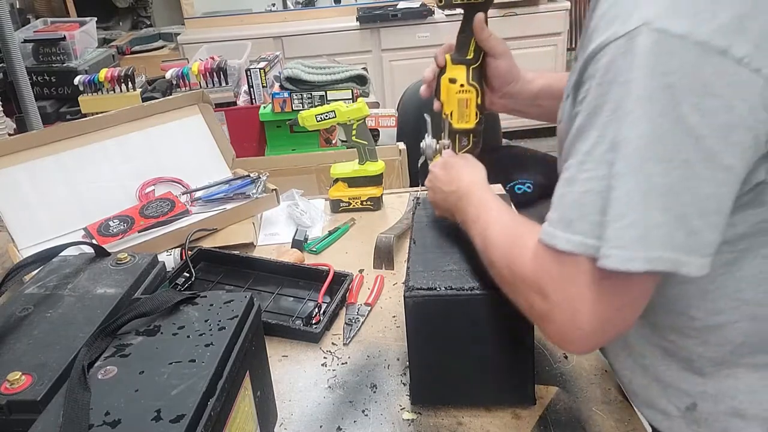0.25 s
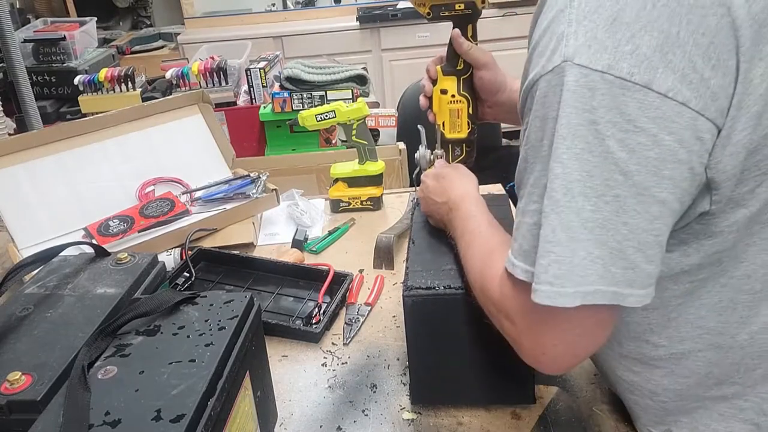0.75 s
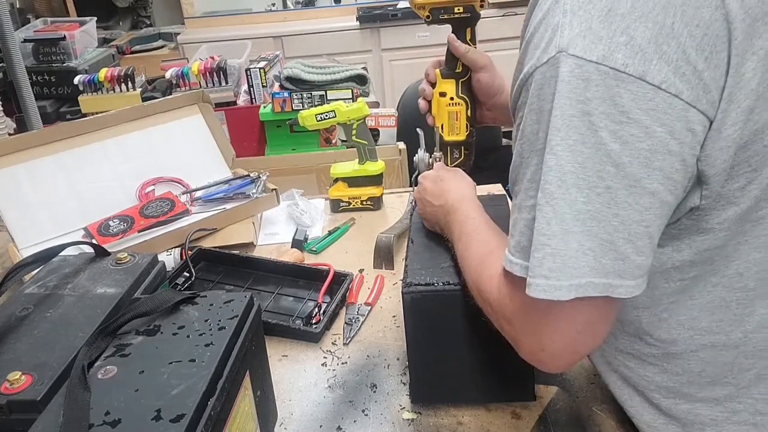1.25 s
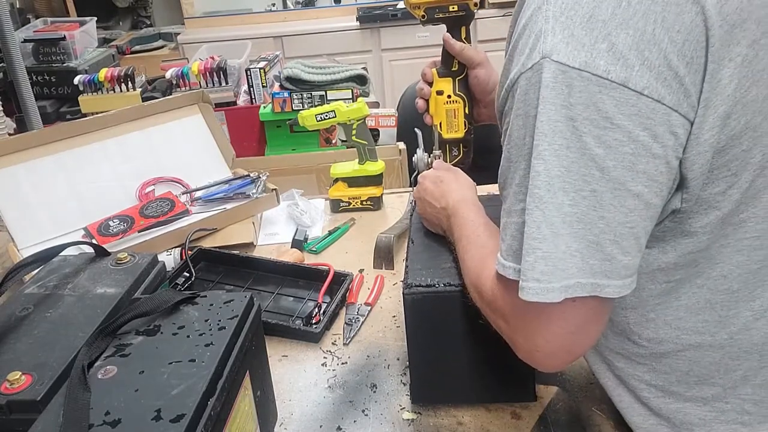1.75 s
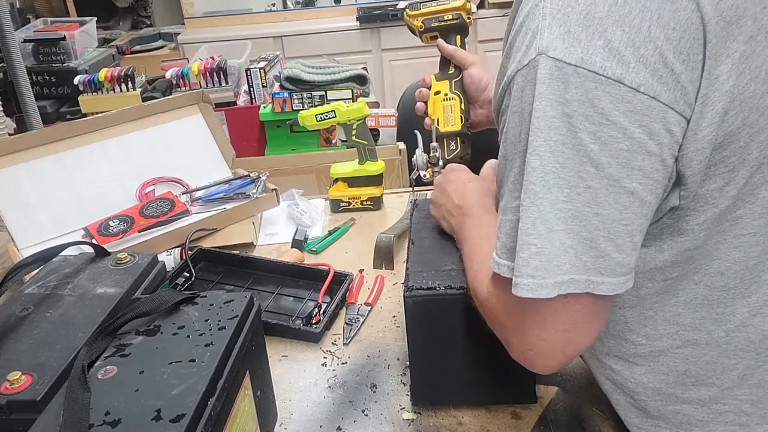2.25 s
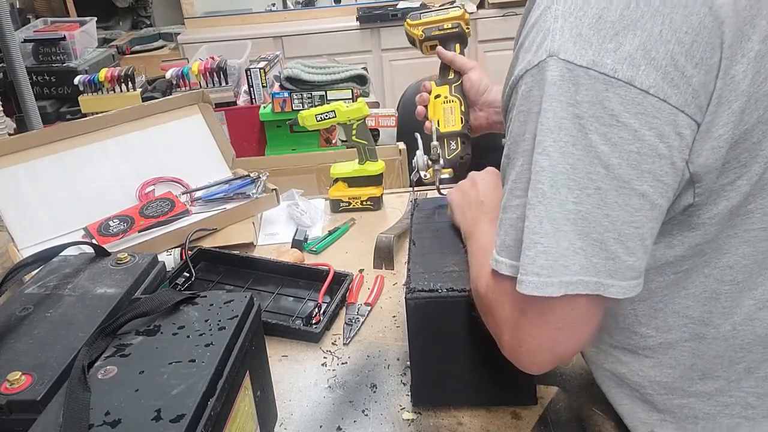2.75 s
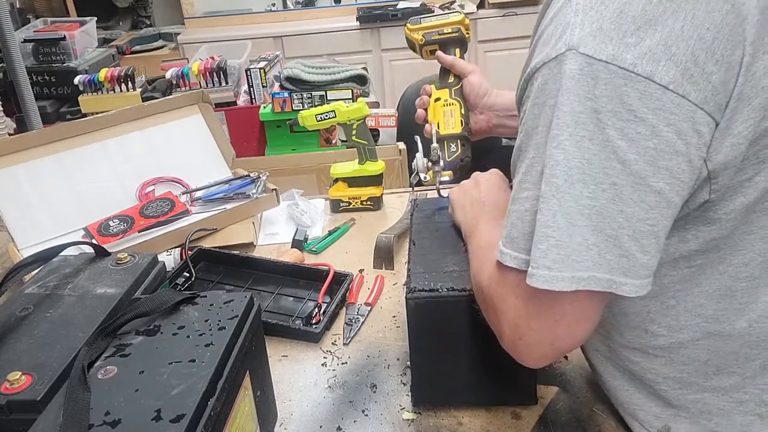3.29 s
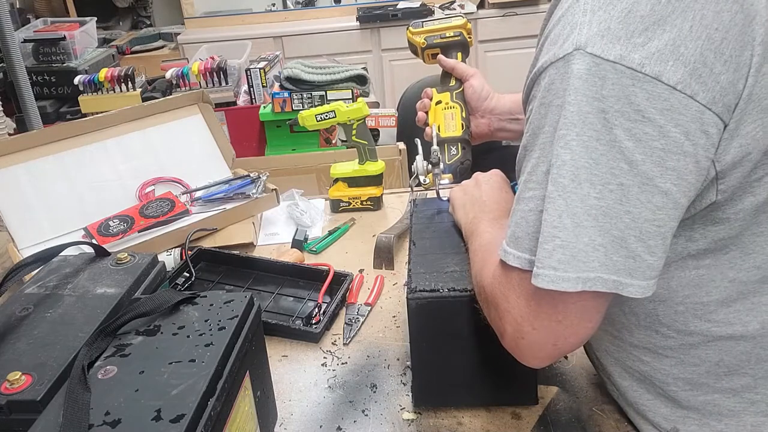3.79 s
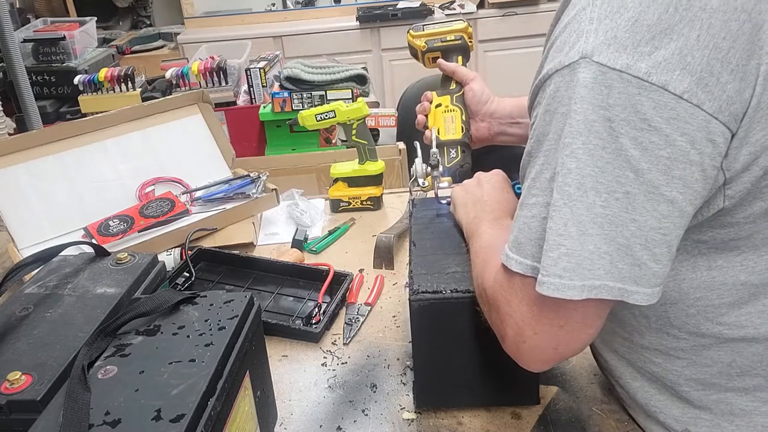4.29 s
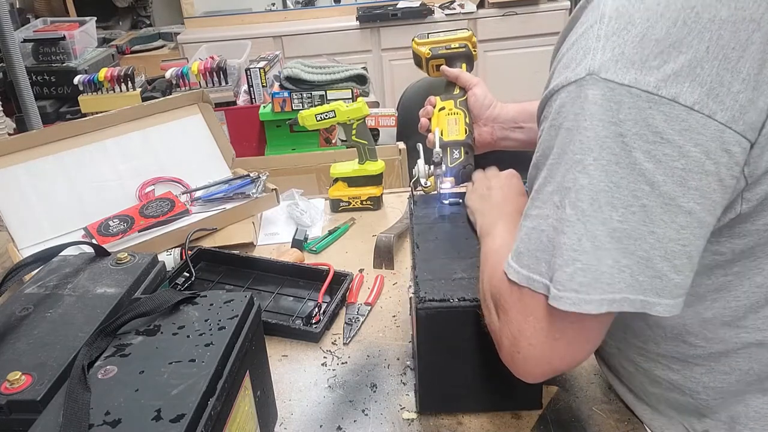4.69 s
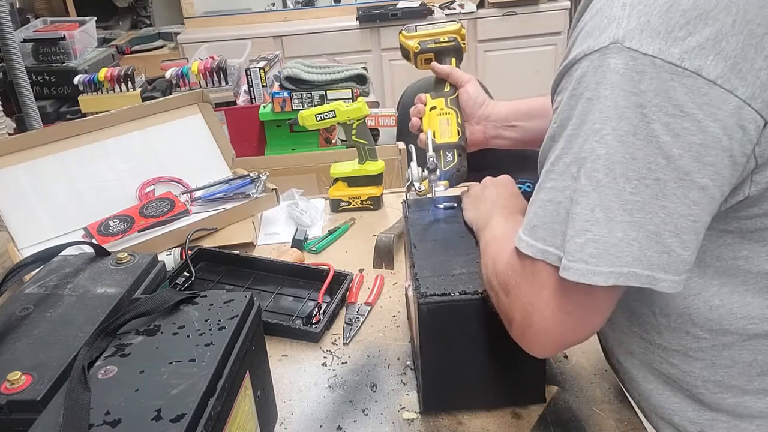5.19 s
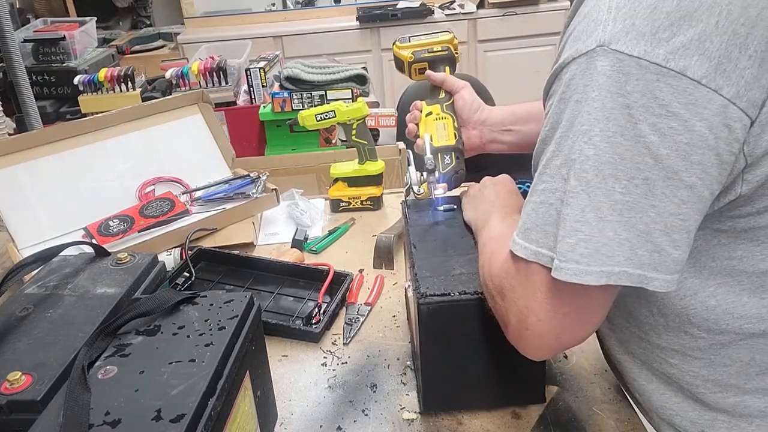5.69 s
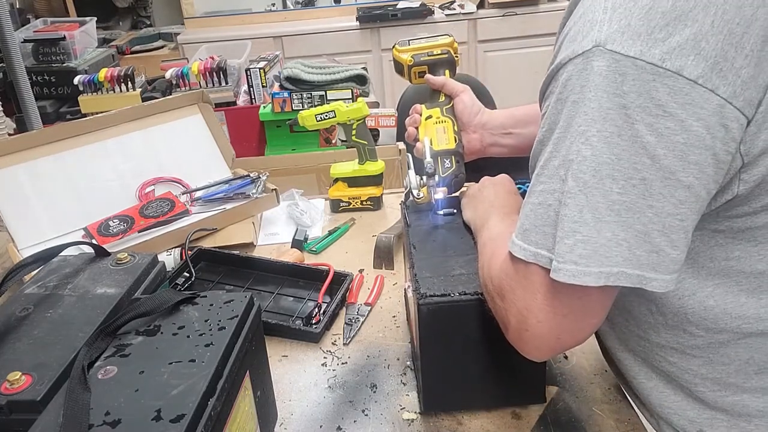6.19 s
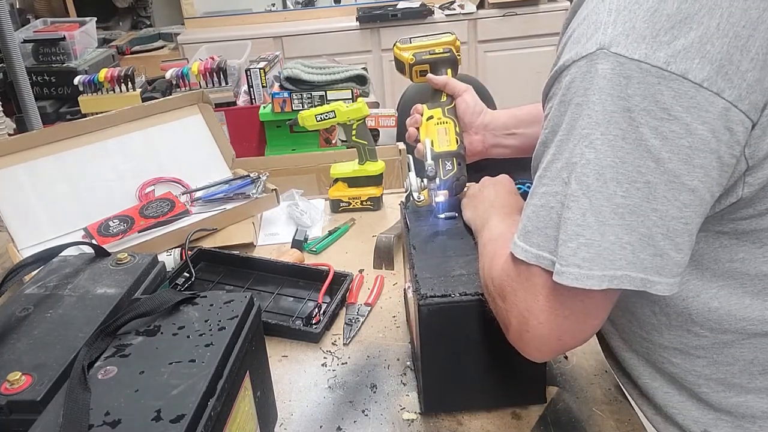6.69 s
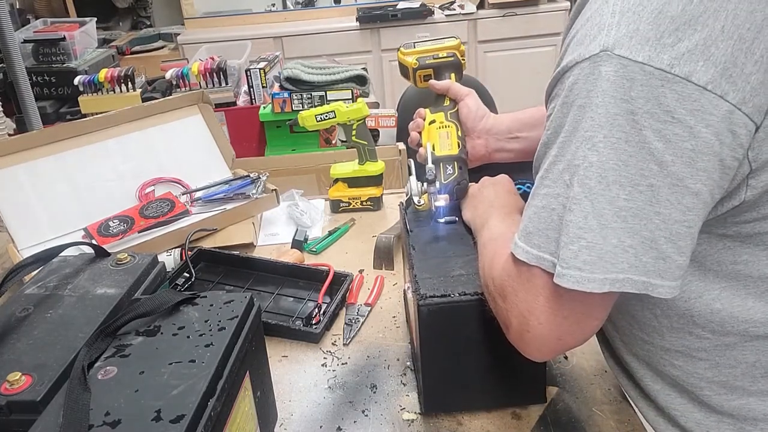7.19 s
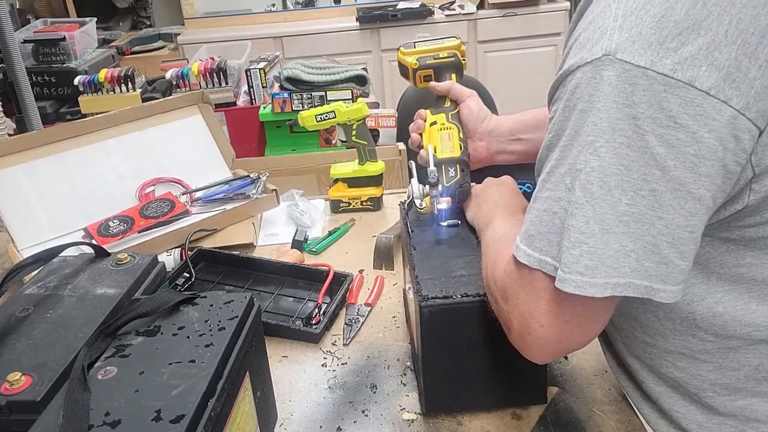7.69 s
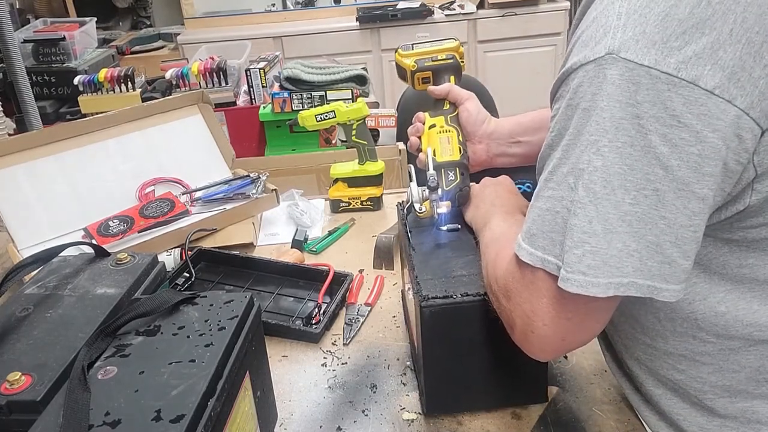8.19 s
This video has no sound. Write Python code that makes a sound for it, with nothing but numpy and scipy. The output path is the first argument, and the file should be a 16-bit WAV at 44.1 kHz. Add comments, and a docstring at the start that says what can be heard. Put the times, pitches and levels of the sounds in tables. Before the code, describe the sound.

A cordless oscillating tool starts, knocks against a hollow plastic case and saws into it with a loud, rasping buzz.

```python
"""On a workshop bench in a small room, an oscillating multi-tool starts up, knocks against a hollow
plastic case and saws into it. The blade swings once per motor turn, and the motor slows under load.
The case drums and buzzes at the swing rate and its multiples; a multiple sings out when it locks onto
a resonance of case or blade. The teeth rasp at each half swing. Two microphone ports hear the tool
from the left, over quiet room noise and the hum of a far-off machine."""
import sys
import numpy as np
from scipy import signal
from scipy.fft import rfft, irfft, next_fast_len
from scipy.io import wavfile
from scipy.ndimage import uniform_filter1d, map_coordinates

SR = 44100
rng = np.random.default_rng(int(sys.argv[2]) if len(sys.argv) > 2 else 0)


def output_pcm(signal):
    """Save a mono or channel-first signal as 16-bit PCM at the path in sys.argv[1].

    Samples are clipped to [-1, 1] before scaling.
    """
    pcm = np.clip(np.atleast_2d(signal).T, -1, 1) * 32767
    wavfile.write(sys.argv[1], SR, np.round(pcm).astype(np.int16))


N = 372644

# The tone of each noise. Each row: frequency in Hz, relative level in dB.
ROOM_TONE = [(20, -7), (80, -7), (300, -3), (900, -4), (2000, -12), (4000, -16), (7000, -20), (8500, -34),
             (10500, -28), (15800, -29)]
THUD_TONE = [(20, -23), (90, -9), (130, -1), (160, 2), (230, 0), (300, -7), (500, -42)]
GEAR_TONE = [(500, -24), (950, 4.5), (1500, -9), (2300, -10), (2900, 6.5), (3400, 7), (4100, -9),
             (7300, -3), (8300, -46), (9000, -70)]
RASP_TONE = [(40, -51), (120, -20), (250, -5), (600, -0.5), (1200, -5), (2200, 2.5), (3500, 3), (5000, -1),
             (7000, -18), (9000, -70)]
HISS_TONE = [(300, -23), (1000, -6), (2500, -11), (4000, -2.5), (5500, -4.5), (7000, -2.5), (8000, -8),
             (9500, -26)]
SIZZLE_TONE = [(8000, -22), (9300, -4), (10500, -7), (11800, 1.5), (13200, -3.5), (14500, -3),
               (16000, -12.5)]
# The tone of the swing's high and highest multiples. Each row: frequency in Hz, relative level in dB.
BUZZ_TONE = [(710, -38), (1200, -3.5), (1630, -1), (2310, -3), (3640, -6), (4990, -10.5), (8300, -21.5),
             (10800, -73), (18300, -120)]
EDGE_TONE = [(3500, -3), (4500, -2), (5600, -3), (7000, 0), (7900, -8), (8600, -30)]
# The far-off machine. Each row: frequency in Hz, level in dB.
HUM_NOTES = [(662.1, -76.5), (1039, -86)]
# How alike the two ports sound. Each row: frequency in Hz, likeness (1 means the same).
LIKENESS = [(60, 0.75), (200, 0.71), (600, 0.11), (1500, 0.51), (4000, 0.36), (8000, 0.37), (12000, 0.083)]
# The balance of the ports. Each row: frequency in Hz, left level minus right level in dB.
LEFT_MINUS_RIGHT = [(100, -.6), (300, .3), (950, -1), (3800, -2.4), (15000, -2.3)]
# Knocks of trigger and blade. Each row: start in seconds, strength in dB, rise time in seconds.
KNOCKS = [(.225, -57, .001), (.315, -53, .0005), (.527, -18, .0006), (.54, -20, 0.0011),
          (.578, -23.5, 0.0035), (.912, -28, .005), (0.944, -24.5, 0.006), (0.969, -27, 0.0028),
          (0.991, -35, .003), (1.315, -31, 0.0044), (1.333, -30, .002), (4.547, -30, .002),
          (6.565, -33, 0.0084), (6.664, -30, 0.008), (6.689, -28, .003)]
# Where the knocked case rings. Each row: frequency in Hz, width in Hz, gain in dB.
CASE_RESONANCES = [(496, 230, 0.5), (1046, 370, 8), (1510, 600, 7.5), (2140, 590, 6.5), (3740, 1240, 1.5),
                   (6940, 1600, -7), (12000, 3200, -22)]
# The gears scraping at the start. Each row: time in seconds, level in dB.
GEAR_LEVELS = [(.315, -58), (.36, -43), (.415, -33), (.44, -37), (.52, -38), (.6, -75)]
# The motor sagging under load. Each row: time in seconds, swings per second.
LOADED_SPEED = [(0.5, 225.0), (0.56, 220.2), (0.92, 216.8), (0.99, 210.5), (1.1, 212.1), (1.36, 192.8),
                (1.41, 194.4), (1.56, 189.3), (1.78, 187.7), (1.94, 182.8), (2.16, 189.7), (2.44, 192.1),
                (2.89, 192.7), (3.57, 185.9), (3.7, 188.9), (3.97, 184.2), (4.41, 184.6), (4.77, 190.8),
                (4.88, 191.2), (4.99, 187.5), (5.37, 188.5), (5.65, 181.2), (6.685, 176.4), (6.72, 183.4),
                (6.91, 182.7), (7.09, 178.8), (7.62, 179.7), (8.44, 174.7)]
# How the blade sits. Each row: time in seconds, unrest from 0 (firm in its slot) to 1 (skipping).
UNREST = [(.3, 1), (1.35, 1), (1.45, .2), (2.1, .2), (3.0, .15), (3.5, .35), (4.4, .3), (4.6, .7),
          (5.4, .6), (5.55, .08), (6.3, .08), (6.5, .8), (6.75, .5), (7.2, .08), (8.05, .08), (8.2, .5)]
# The strength of the cut. Each row: time in seconds, hiss of motor and teeth in dB, blade bite in dB.
CUT_LEVELS = [(0.32, -42, -63), (0.34, -50, -50), (0.41, -41, -26.5), (0.52, -46, -34), (0.82, -43, -32),
              (0.84, -49, -34), (0.95, -42, -33.5), (1.29, -39, -31), (1.34, -40.5, -33),
              (1.88, -39.5, -32), (2.08, -47, -35.5), (2.49, -43.5, -34.5), (2.72, -42.5, -34),
              (3.46, -39.5, -31.5), (3.64, -40, -32.5), (4.84, -38.5, -32), (5.23, -40.5, -33.5),
              (5.38, -38, -32), (5.5, -40.5, -32.5), (5.72, -37.5, -31.5), (7.22, -38, -32),
              (7.33, -38, -31), (8.17, -39.5, -33.5), (8.44, -37.5, -30.5)]
# The drumming walls. Each row: time in seconds, level at the swing rate in dB, at twice that rate in dB.
DRUM_LEVELS = [(0.36, -83, -84), (0.4, -59, -69), (.44, -57, -55), (.52, -62, -60), (.548, -42, -44),
               (.572, -58, -48), (0.595, -41, -45), (0.63, -39, -64), (0.85, -49, -48), (0.9, -42.5, -46.5),
               (1.19, -50.5, -54.5), (1.24, -64, -48), (1.3, -46, -49), (1.58, -39, -42),
               (1.87, -41, -30.5), (2.05, -51, -44.5), (2.09, -42.5, -46.5), (2.56, -33, -37.5),
               (3.42, -36.5, -36.5), (3.49, -36, -32.5), (4.05, -39, -37), (4.52, -41, -37.5),
               (4.64, -36.5, -29.5), (4.75, -30.5, -36), (5.18, -42, -38.5), (5.31, -41.5, -46),
               (5.42, -41.5, -38.5), (5.87, -52, -41.5), (6.64, -54.5, -48.5), (6.73, -51, -32),
               (7.04, -54.5, -36), (8.06, -51, -39.5), (8.15, -46, -44.5), (8.44, -41.5, -36)]
# The walls at 3, 4, 5 and 6 times the swing rate. Each entry: level relative to the bite in dB.
UPPER_DRUM_DB = [-16.5, -10.5, -11, -10.5]
# Locks onto a resonance. Each row: start in seconds, length in seconds, multiple, level in dB.
LOCKS = [(0.448, .05, 8, -42), (0.463, 0.057, 16, -38), (0.604, 0.17, 3, -36), (0.65, 0.26, 10, -37.5),
         (0.674, 0.27, 4, -43), (1.024, 0.11, 5, -36), (.74, 0.088, 12, -33.5), (.76, 0.12, 6, -41),
         (0.788, 0.051, 8, -35), (.99, 0.038, 7, -34.5), (1.065, 0.056, 16, -31), (1.087, 0.068, 7, -31),
         (1.106, 0.063, 9, -29), (1.103, 0.24, 10, -30.5), (1.122, 0.098, 3, -39.5), (1.11, 0.048, 12, -34),
         (1.12, 0.062, 14, -31.5), (1.15, .07, 8, -34.5), (1.222, 0.088, 7, -28.5),
         (1.258, 0.039, 3, -36.5), (1.271, 0.041, 17, -33), (1.41, 0.17, 17, -32.5), (1.413, 0.18, 3, -40),
         (1.402, 0.077, 4, -37), (1.406, 0.24, 5, -38.5), (1.452, 0.32, 13, -35.5), (1.47, 0.12, 11, -32),
         (1.503, 0.042, 6, -40), (1.54, .17, 16, -35.5), (1.665, 0.3, 17, -35), (1.716, 0.13, 20, -31),
         (1.69, 0.13, 3, -42.5), (1.766, 0.23, 12, -35.5), (1.83, 0.18, 5, -40), (1.89, 0.11, 16, -32),
         (2.04, 0.44, 3, -45.5), (2.15, 0.58, 9, -37.5), (2.13, .22, 10, -42), (2.2, 0.17, 14, -41.5),
         (2.28, .6, 17, -45), (2.34, 0.23, 15, -41), (2.208, 0.22, 6, -38.5), (2.365, 0.23, 10, -34.5),
         (2.47, .1, 14, -41), (2.65, 0.24, 14, -46.5), (2.7, .12, 15, -42), (2.7, .3, 10, -42),
         (2.84, .13, 9, -43), (2.506, 0.25, 3, -42), (2.745, 0.18, 5, -46), (2.894, 0.29, 6, -45),
         (2.975, 0.33, 3, -41.5), (3.088, 0.36, 8, -36.5), (3.16, 0.43, 11, -37), (3.17, 0.82, 6, -37.5),
         (3.427, 0.092, 6, -34), (3.47, .06, 4, -41), (3.463, 0.1, 15, -37), (3.476, 0.095, 14, -40),
         (3.6, 0.25, 3, -38.5), (3.6, 0.34, 4, -38), (3.793, 0.39, 11, -42), (3.884, 0.042, 11, -39),
         (3.96, 0.35, 5, -40.5), (3.97, .52, 10, -40), (4.05, 0.28, 9, -42), (4.22, 0.077, 12, -38),
         (4.33, 0.24, 4, -40), (4.51, 0.066, 11, -35.5), (4.505, 0.086, 12, -36), (4.6, 0.18, 14, -44),
         (4.73, 0.24, 11, -38), (4.717, .1, 19, -34.5), (4.773, 0.63, 4, -38.5), (4.78, .04, 18, -40),
         (4.81, 0.045, 15, -39), (4.83, 0.066, 8, -34), (4.91, .04, 24, -37), (4.872, 0.14, 3, -43),
         (4.877, 0.32, 6, -45.5), (4.983, 0.48, 5, -42.5), (5.216, 0.55, 3, -42), (5.286, 0.19, 7, -36),
         (5.31, 0.21, 6, -35.5), (5.347, 0.19, 13, -35.5), (5.366, .09, 14, -37.5), (5.51, 0.92, 6, -36.5),
         (5.524, 0.83, 9, -35), (5.555, 1.09, 5, -46), (5.68, 0.55, 20, -36), (5.742, 0.27, 16, -39.5),
         (5.79, 0.076, 8, -37), (6.19, .2, 11, -38), (6.3, .3, 12, -42), (6.34, 0.17, 8, -36),
         (6.557, 0.26, 6, -40), (6.58, 0.11, 8, -36.5), (6.72, 0.27, 10, -43.5), (6.669, 0.3, 9, -36),
         (6.717, 1.62, 4, -40), (6.956, 0.24, 6, -42.5), (6.954, 0.18, 20, -37), (7.036, 0.13, 11, -34.5),
         (7.217, 0.66, 8, -37.5), (7.22, 0.18, 11, -37.5), (7.3, 0.4, 13, -38.5), (7.235, 0.84, 6, -32),
         (7.244, 0.79, 9, -33.5), (8.05, 0.37, 12, -41), (8.085, .35, 6, -42.5), (8.097, 0.24, 20, -37.5)]

START_S, SWELL_S = .315, .075  # when the trigger closes; how long a lock takes to rise or fall
BLUR_RADIANS = .012  # how early or late single swings come
BLOCK = 32  # samples over which slow changes hold still
TIME = np.arange(N) / SR


def amp(db):
    """Turn decibels into a gain."""
    return 10 ** (np.asarray(db) / 20)


def unit(x):
    """Scale a sound to an average power of 1."""
    return x / np.sqrt(np.mean(x ** 2) + 1e-20)


def along(points, hz):
    """Read a table at any frequency, on a log scale."""
    f, v = np.transpose(points)
    return np.interp(np.log(hz + 1), np.log(f + 1), v)


def curves(rows):
    """One value per sample for each column after the time."""
    times, *columns = np.transpose(rows)
    return [np.interp(TIME, times, column) for column in columns]


def wobble(rate):
    """A smooth curve through `rate` random values a second."""
    coarse = np.arange(0, N + BLOCK, BLOCK)
    curve = map_coordinates(rng.standard_normal(int(N * rate / SR) + 4), [coarse * rate / SR])
    return np.interp(np.arange(N), coarse, curve)


def filtered(x, response):
    """Change each frequency's strength and phase by response(hz)."""
    size = next_fast_len(N + SR // 2)
    return irfft(rfft(x, size) * response(np.fft.rfftfreq(size, 1 / SR)), size)[..., :N]


def stereo_shares(hz):
    """Gains for what the ports share (mid) and what sets them apart (side)."""
    turn = np.arccos(np.clip(along(LIKENESS, hz), -1, 1)) / 2
    return np.array([np.cos(turn), np.sin(turn)])


def rush(tone, gate, patchy_db):
    """Stereo noise with random loud and soft patches, shaped in time by the gate."""
    cells = signal.stft(rng.standard_normal((2, N)), nperseg=512)[2]
    patches = uniform_filter1d(rng.standard_normal(cells.shape[1:]), size=5, axis=0)
    patches = unit(uniform_filter1d(patches, size=10, axis=1))
    noise = gate * signal.istft(cells * amp(patchy_db * patches), nperseg=512)[1][:, :N]
    mid, side = filtered(noise, lambda hz: amp(along(tone, hz)) * stereo_shares(hz))
    return unit(np.array([mid + side, mid - side]))


def workshop():
    """Quiet room noise and the faint hum of a machine far off."""
    hum = sum(np.sqrt(2) * amp(db + 1.5 * wobble(20)) * np.sin(2 * np.pi * hz * TIME)
              for hz, db in HUM_NOTES)
    return amp(-70) * rush(ROOM_TONE, 1, patchy_db=1.5) + hum


def case_ring(hz):
    """How the hollow case answers a knock: its resonances, added with alternating signs."""
    return sum((-1) ** i * amp(db) * 1j * hz * width / (centre ** 2 - hz ** 2 + 1j * hz * width)
               for i, (centre, width, db) in enumerate(CASE_RESONANCES))


def knocks():
    """Trigger and blade give short rattles of noise that ring the case."""
    blows, t = np.zeros((2, N + SR)), np.arange(SR // 5) / SR
    for start, db, rise in KNOCKS:
        noise = rng.standard_normal(len(t)) + .66 * rng.standard_normal((2, len(t)))
        ring_s = .098 + 19 * rise  # a softer blow takes longer to fall by 60 dB
        envelope = amp(db - 60 * t / ring_s) * (1 - np.exp(-t / rise))
        blows[:, round(start * SR):][:, :len(t)] += envelope * noise
    return filtered(blows[:, :N], case_ring)


def gear_scrape():
    """The gear head scrapes as it spins up."""
    rough_noise = amp(2.3 * wobble(129.4)) * rng.standard_normal(N)
    scrape = filtered(rough_noise, lambda hz: amp(along(GEAR_TONE, hz)))
    return amp(curves(GEAR_LEVELS)[0]) * unit(scrape)


def bench_thud(drum_db):
    """The bench shakes more as the case drums harder."""
    return amp(.8 * drum_db - 31) * rush(THUD_TONE, 1, patchy_db=.8)


def teeth(angle, unrest, settled, bite_db, hiss_db):
    """Tearing plastic rasps, motor and teeth hiss, and the finest scraping sizzles."""
    # The teeth cut hardest in mid swing, one way more than the other.
    strokes = amp(3 * np.cos(2 * angle) + 2.5 * np.cos(angle) + 1.1 * wobble(60))
    tearing = strokes * amp(2 * wobble(400))
    rasp = amp(bite_db - 10 + 3 * unrest) * rush(RASP_TONE, tearing, patchy_db=3)
    hiss = amp(hiss_db + .5) * rush(HISS_TONE, strokes ** .22, patchy_db=4)
    sizzle = amp(hiss_db - 10) * rush(SIZZLE_TONE, strokes ** .45, patchy_db=1.5)
    return np.sqrt(settled) * (rasp + hiss) + settled * sizzle


def drumming_walls(angle, phases, unrest, walls_db):
    """The blade shakes the walls of the case at the lowest multiples of its swing."""
    out = np.zeros((2, N))
    for k, db in enumerate(walls_db, 1):
        apart = .13 * k * wobble(7)  # reflections shift the phase between the ports
        level = amp(db + (1 + 1.8 * unrest) * wobble(14))
        level *= 1 + .15 * wobble(90)  # no two swings bite alike
        phase = k * angle + phases[k] + .12 * wobble(90)
        out += np.sqrt(2) * level * np.sin(phase + np.array([apart, -apart]))
    return out


def locked(k):
    """For each block: 1 while multiple k is locked, fading to 0 when it is free."""
    t = TIME[::BLOCK]
    held = np.zeros(len(t))
    for start, length, multiple, _ in LOCKS:
        if round(multiple) == k:
            inside_s = np.minimum(t - start, start + length - t)
            held = np.maximum(held, np.clip(inside_s / SWELL_S + .5, 0, 1))
    return held


def fading(rate):
    """Four random curves, one value per block, with `rate` new targets a second."""
    position = TIME[::BLOCK] * rate
    targets = rng.standard_normal((4, int(N * rate / SR) + 2))
    return np.array([np.interp(position, np.arange(len(row)), row) for row in targets])


def overtones(tone, multiples, angle, rate, unrest, slow_hz, quick_hz, chatter):
    """Multiples of the swing fade in and out as the cut changes, quicker when the blade skips."""
    angle = np.resize(angle, (len(TIME[::BLOCK]), BLOCK))
    unrest = unrest[::BLOCK]
    out = np.zeros((2, *angle.shape))
    flare = fading(16)[0]
    for k in multiples:
        flare = .75 * flare + np.sqrt(1 - .75 ** 2) * fading(16)[0]  # neighbours flare together
        drift = np.sqrt(1 - unrest) * fading(slow_hz) + np.sqrt(unrest) * fading(quick_hz)
        drift += chatter * k * (.94 + .5 * unrest) * fading(55)  # chatter blurs high ones more
        mid, side = stereo_shares(k * np.mean(rate))[:, None] * (drift[::2] + 1j * drift[1::2])
        db = along(tone, k * rate[::BLOCK]) + 1.75 * (1 + unrest) * flare
        db -= 7.5 * locked(k)  # a locked multiple has less loose buzz
        gain = amp(db) * [mid + side, mid - side]
        out += np.real(gain[..., None] * np.exp(1j * k * angle))
    return unit(out.reshape(2, -1)[:, :N])


def blade_buzz(angle, rate, unrest, bite_db):
    """The biting blade buzzes at high multiples of its swing; its thin edge adds the highest."""
    angle = angle + BLUR_RADIANS * (.5 + unrest) * wobble(120)  # skipping makes the swings uneven
    buzz = overtones(BUZZ_TONE, range(7, 22), angle, rate, unrest, slow_hz=7, quick_hz=24, chatter=.015)
    edge = overtones(EDGE_TONE, range(22, 43), angle, rate, unrest, slow_hz=9, quick_hz=25, chatter=.014)
    return amp(bite_db - 1.5 + unrest) * buzz + amp(bite_db - 4.5) * edge


def singing_locks(angle, phases, unrest):
    """Single multiples swell and fade as they lock onto a resonance of case or blade."""
    out = np.zeros((2, N))
    flutter, shiver, jitter = wobble(24), 1 + .15 * wobble(90), BLUR_RADIANS * wobble(120)
    for (start, length, k, db), (shift, apart, pan) in zip(LOCKS, rng.standard_normal((len(LOCKS), 3))):
        span = slice(round((start - SWELL_S / 2) * SR), round((start + length + SWELL_S / 2) * SR))
        swell = signal.windows.tukey(len(angle[span]), min(1, 2 * SWELL_S / (length + SWELL_S)))
        flutter_db = .2256 * min(k + 2, 16) * (unrest[span] + k / 40)  # high ones flutter more
        swell *= amp(flutter_db * np.roll(flutter, round(SR * shift))[span]) * shiver[span]
        # Pulsing with each swing wakes the neighbouring multiples.
        swell *= 1 + .02 * (1 + unrest[span]) * max(k - 6, 0) * np.cos(angle[span] + shift)
        spread = min(k / 8, 1) * np.array([[1], [-1]])  # low ones reach both ports more alike
        phase = k * (angle[span] + jitter[span]) + phases[k] + .27 * apart * spread
        out[:, span] += np.sqrt(2) * amp(db + 1.3 * pan * spread) * swell * np.sin(phase)
    return out


def swing_rate():
    """Swings per second: the motor speeds up steadily, then follows its loaded speed."""
    climb = 112 + 900 * np.maximum(TIME - START_S, 0)
    return np.minimum(climb, curves(LOADED_SPEED)[0])


def multi_tool():
    """The gears spin up, then one swinging blade drives all the sounds of the cut."""
    rate = swing_rate()
    hiss_db, bite_db = curves(CUT_LEVELS)
    unrest, = curves(UNREST)
    bite_db += 1.8 * unrest * wobble(16)  # a skipping blade bites unevenly
    settled = np.interp(TIME, [.4, .52, .54], [.14, .45, 1])  # the sound firms up once at speed
    walls_db = curves(DRUM_LEVELS)
    walls_db += [bite_db + 20 * np.log10(settled) + db + 1.6 * wobble(6) for db in UPPER_DRUM_DB]
    scatter_hz = (.3506 + .45 * unrest) * wobble(25)
    angle = 2 * np.pi * np.cumsum(rate + scatter_hz) / SR % (2 * np.pi)
    phases = rng.uniform(0, 2 * np.pi, size=25)  # one per multiple
    sound = drumming_walls(angle, phases, unrest, walls_db) + bench_thud(walls_db[0])
    sound += settled * blade_buzz(angle, rate, unrest, bite_db)
    sound += teeth(angle, unrest, settled, bite_db, hiss_db)
    sound += gear_scrape() + singing_locks(angle, phases, unrest)
    return (TIME > START_S) * sound


def ports(hz, lead_samples=4):
    """The nearer, left port hears the tool first and at a slightly different level."""
    left = amp(along(LEFT_MINUS_RIGHT, hz) / 2) * np.exp(1j * np.pi * hz * lead_samples / SR)
    return np.array([left, 1 / left])


def scene():
    """The tool and its knocks come from the left, over the sound of the room."""
    return filtered(multi_tool() + knocks(), ports) + workshop()


def record(dry):
    """The microphone has a dead spot in the treble and keeps nothing above its upper limit."""
    dead_spot = lambda hz: amp(-20 * np.exp(-((hz - 8850) / 480) ** 2))
    return filtered(dry, lambda hz: dead_spot(hz) * (hz < 15770))


dry = scene()
out = record(dry)
output_pcm(out)
```